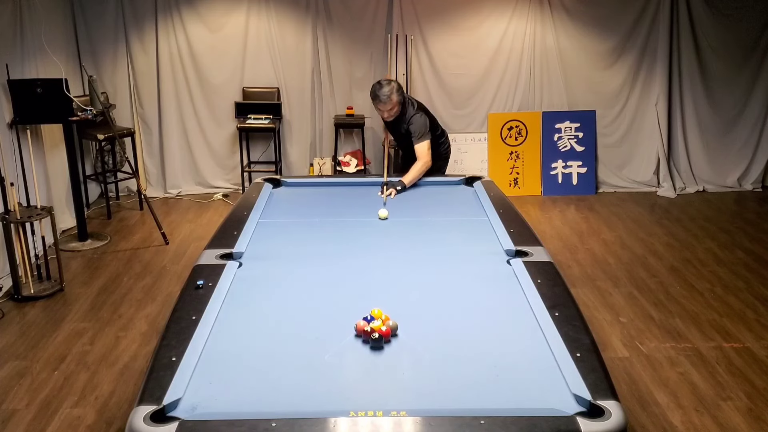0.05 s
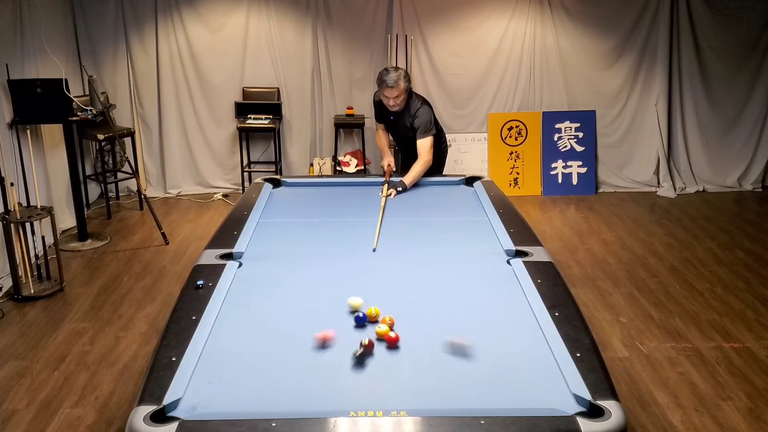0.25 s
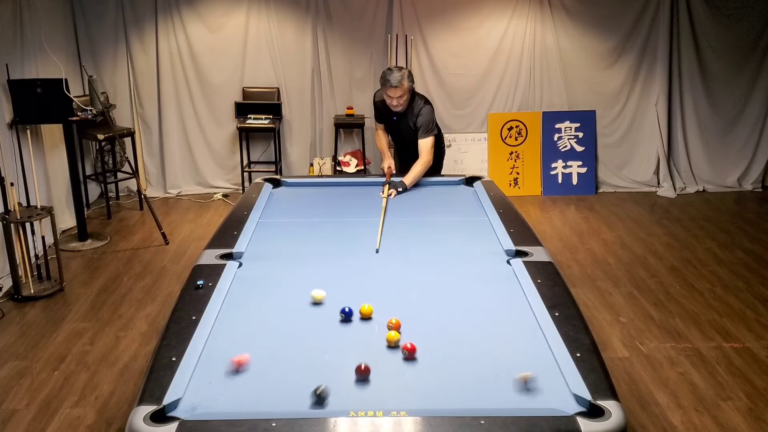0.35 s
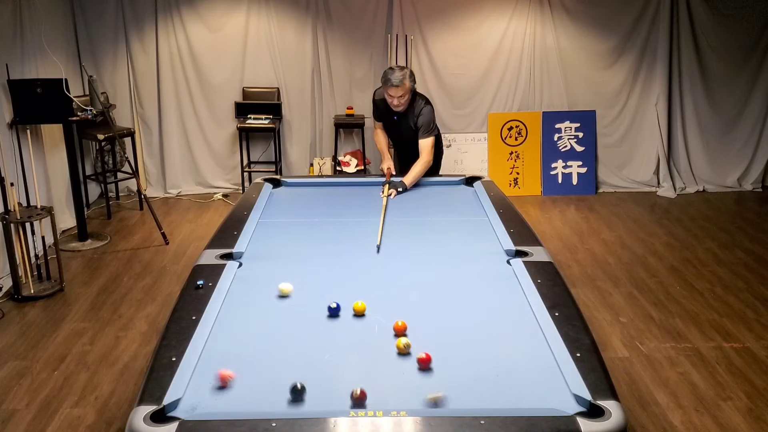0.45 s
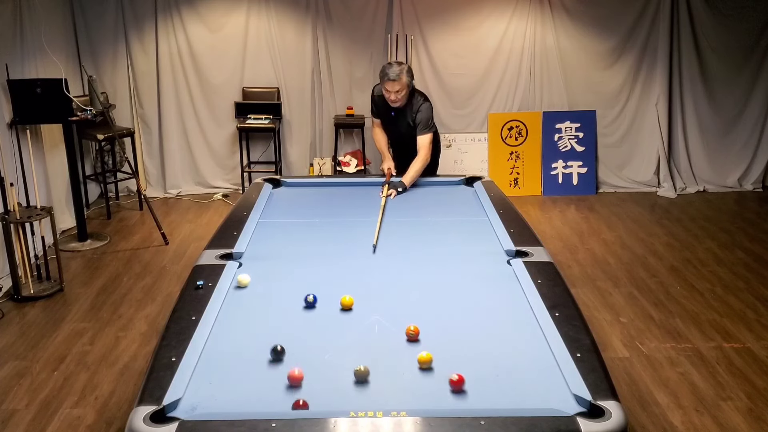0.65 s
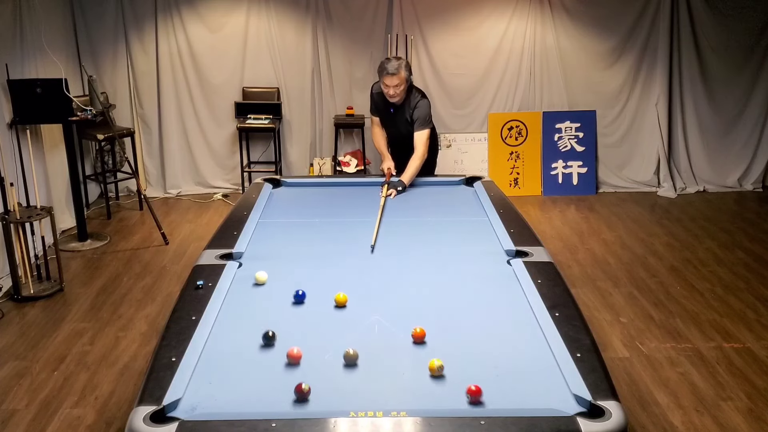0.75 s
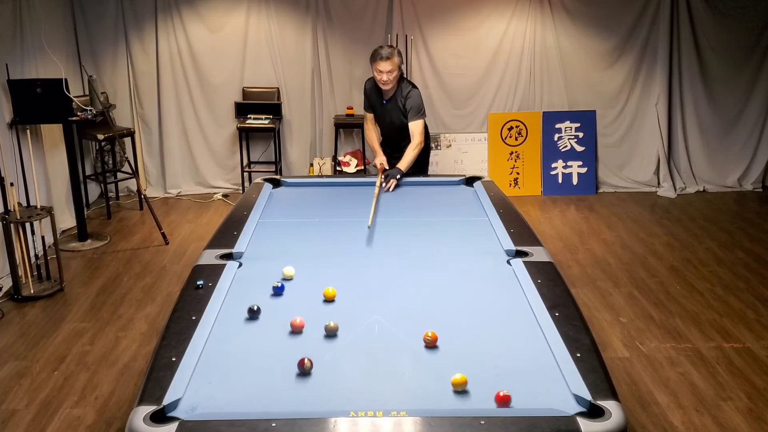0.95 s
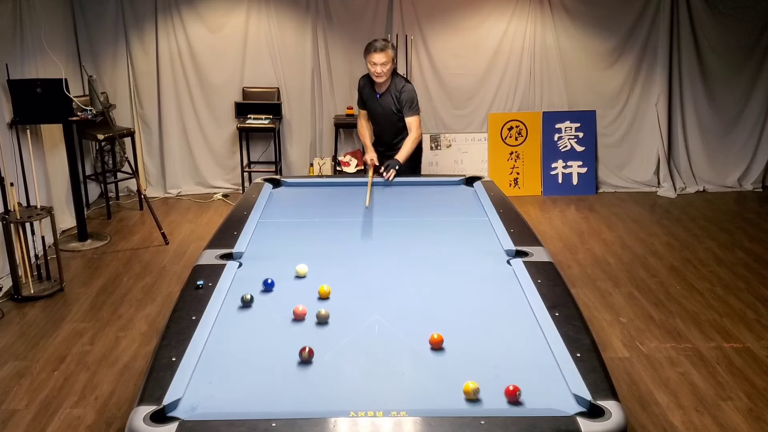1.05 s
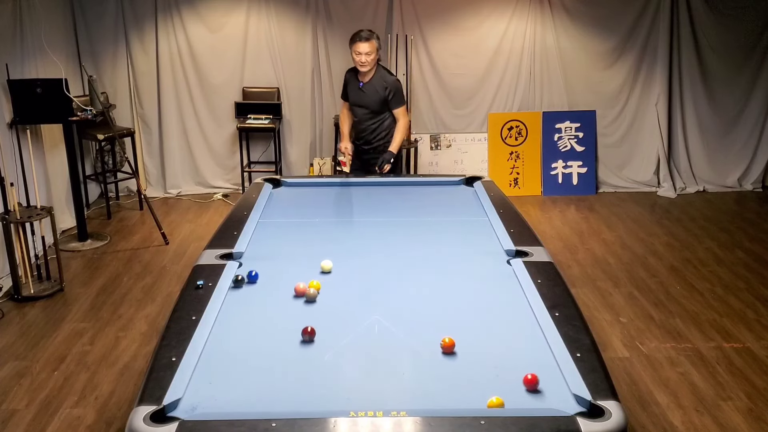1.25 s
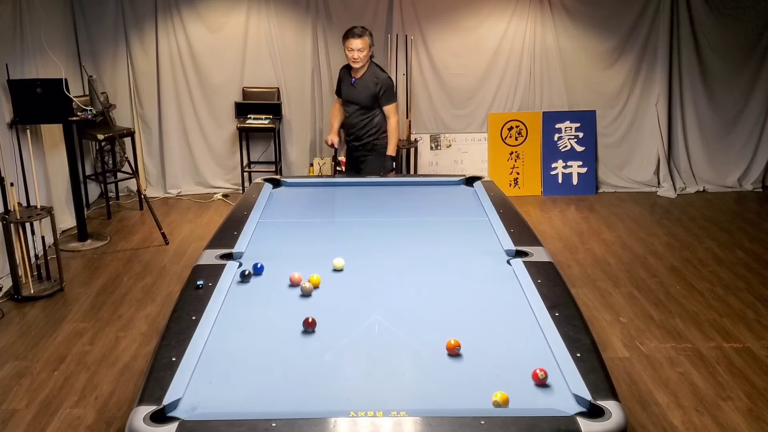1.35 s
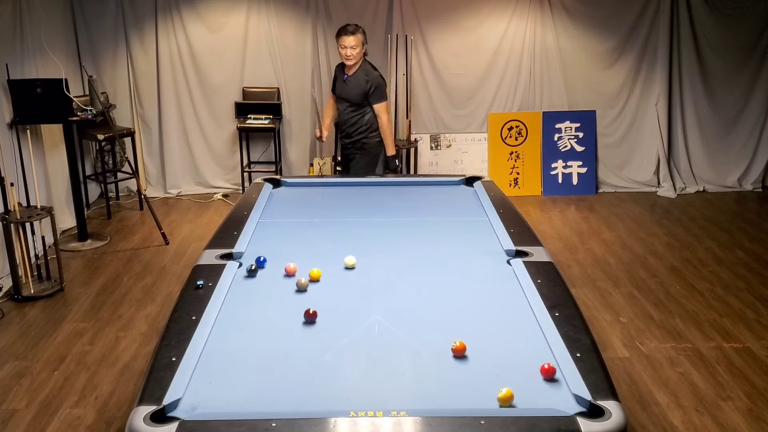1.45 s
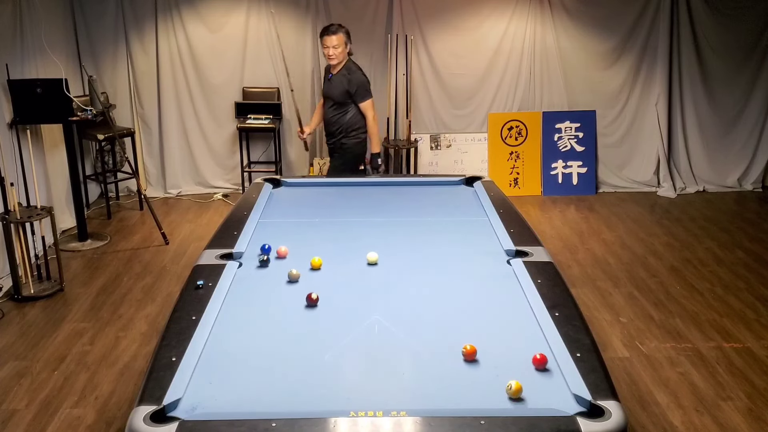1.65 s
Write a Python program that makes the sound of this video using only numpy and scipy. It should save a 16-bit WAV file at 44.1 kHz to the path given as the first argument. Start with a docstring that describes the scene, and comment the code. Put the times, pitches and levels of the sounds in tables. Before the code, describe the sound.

A pool break: cue crack, loud burst of racked balls, then rolling and sharp clicks.

```python
"""A curtained hall, at the foot rail of a pool table: a break shot.
The cue taps the bridge hand, then cracks against the cue ball; shaft and ball ring in damped modes.
The ball bursts the rack, and the brief pressure pulses of the collisions overload the microphone.
The balls scatter, click together, thud into the cushions and rumble over the slate.
The hall reverberates after each blow, over a faint steady background."""
import sys
import numpy as np
from scipy import signal
from scipy.fft import rfft, irfft
from scipy.io import wavfile

SR = 44100
rng = np.random.default_rng(int(sys.argv[2]) if len(sys.argv) > 2 else 0)


def master_out(mix):
    """Clip the mix to full scale and print it as 16-bit PCM to the path in sys.argv[1]."""
    frames = np.transpose(np.atleast_2d(mix))
    ceiling = np.clip(frames, -1, 1)
    pcm = np.round(ceiling * 32767).astype(np.int16)
    wavfile.write(sys.argv[1], SR, pcm)


N = 74970
STROKE_S = .2135


def undb(db):
    """Amplitude ratio of a level: 20 dB to a factor of ten."""
    return 10 ** (np.asarray(db) / 20)


def seconds():
    """Time axis of uniform sampling, t/s."""
    return np.arange(N) / SR


def freqs():
    """Frequency axis of the Fourier transform, f/Hz, held at 1 or above."""
    return np.maximum(np.arange(N // 2 + 1) * SR / N, 1)


def colour(points):
    """Spectral envelope: gain from (f/Hz, level/dB) points, interpolated in log frequency."""
    hz, db = np.array(points).T
    return undb(np.interp(np.log(freqs()), np.log(hz), db))


def noise(gain):
    """Random phases turn a magnitude spectrum into stationary noise of rms 1."""
    x = irfft(gain * np.exp(2j * np.pi * rng.random(len(gain))), N)
    return x / x.std()


def pulse(gain):
    """Minimum phase: folding the cepstrum gives the shortest causal pulse with this spectrum."""
    cepstrum = irfft(np.log(gain), N)
    cepstrum[1:N // 2] *= 2
    cepstrum[N // 2 + 1:] = 0
    return irfft(np.exp(rfft(cepstrum)), N)


def fade(t60):
    """Exponential damping: 60 dB in t60 seconds."""
    return np.exp(-np.log(1000) * seconds() / t60)


def burst(points, t60):
    """Source and filter: the noise of a short rough contact, coloured by the struck body."""
    return signal.fftconvolve(rng.standard_normal(N) * fade(t60), pulse(colour(points)))[:N]


def delay(x, start):
    """Time shift by start seconds."""
    return np.concatenate([np.zeros(int(start * SR)), x])[:N]


def place(x, start, peak_db):
    """Time shift and scaling to a peak level."""
    return delay(x, start) * undb(peak_db) / np.abs(x).max()


def stereo(mid, side, side_db):
    """Left and right as sum and difference of mid and side."""
    return mid + undb(side_db) * side * np.array([[1], [-1]])


def pan(x, left_db):
    """Localisation by left-right level difference."""
    return x * undb(np.array([[left_db], [-left_db]]) / 2)


def background():
    """Stationary noise of the hall, partly correlated between left and right."""
    # background spectrum: f/Hz, level/dB
    spectrum = [(25, -16), (70, -4), (130, -5.5), (230, 5.5), (400, -2), (700, -2), (1100, -8.5),
                (1600, -9.5), (2500, -22.5), (5500, -16.5), (9000, -24), (15000, -27)]
    gain = colour(spectrum)
    return undb(-71) * stereo(noise(gain), noise(gain), side_db=-4.5)


def bridge_tap():
    """A heavily damped impact: the cue touches the bridge hand while aiming."""
    # spectrum of the tap: f/Hz, level/dB
    spectrum = [(100, -8), (250, 8), (380, -7.5), (560, 5), (1000, -9.5), (1600, -4.5), (2500, -27),
                (8000, -40.5)]
    return place(burst(spectrum, t60=.012), start=.020, peak_db=-43)


def rolling():
    """Rolling contact drives the table into a rumble that weakens as the balls slow."""
    # rumble spectrum: f/Hz, level/dB
    spectrum = [(30, -32.5), (55, -19.5), (78, 0.5), (105, -10.5), (200, -8.5), (450, -11), (900, -29),
                (2000, -49)]
    # rumble envelope: t/s, rms level/dB
    envelope = [(.2, -69), (0.242, -56), (.36, -43.5), (.47, -38.5), (0.532, -45), (0.588, -50), (.69, -53),
                (.76, -56), (0.869, -62.5), (.96, -67.5), (1.03, -66), (1.1, -77), (1.401, -70),
                (1.7, -78.5)]
    times, levels = np.array(envelope).T
    return noise(colour(spectrum)) * undb(np.interp(seconds(), times, levels))


def tip_crack():
    """A short impact excites a broad band: the tip bites, then cracks against the cue ball."""
    # spectrum of the contact: f/Hz, level/dB
    spectrum = [(60, -22), (150, -1.5), (370, 0), (650, 7.5), (1000, 1.5), (1700, -3.5), (2600, -2.5),
                (3700, -4.5), (4700, 3), (6100, -11.5), (7800, -9), (9600, -13), (14500, -15)]
    t60, bite_lead_s = .022, .0025
    crack = place(burst(spectrum, t60), STROKE_S, peak_db=-2)
    bite = place(burst(spectrum, t60), STROKE_S - bite_lead_s, peak_db=-26.5)
    return crack + bite


def cue_ring():
    """Free vibration: after the stroke, shaft and ball ring as a sum of damped modes."""
    # modes of cue and ball: f/Hz, level/dB, T60/s
    modes = [(631, -4, .025), (1160, -14, .13), (1637, -9.5, .15), (3052, -24, 0.082), (4255, 2, .025),
             (4654, 1.5, 0.038), (4730, -20.5, 0.27), (5020, 4, 0.025), (6850, -8.5, .02),
             (7870, -5.5, 0.024), (8500, -11.5, .03), (13700, -8.5, .02)]
    t, push_s = seconds(), .00012
    ring = sum(undb(db) * fade(t60) * np.sin(2 * np.pi * (hz * t + rng.random()))
               for hz, db, t60 in modes)
    onset = 1 - np.exp(-t / push_s)
    return undb(-9.5) * delay(ring * onset, STROKE_S)


def thuds():
    """Compliant contact: rubber cushion and wooden rail take each ball with a soft, low knock."""
    # ball against cushion or slate: t/s, peak level/dB, centre f/Hz
    impacts = [(.228, -22.5, 433), (.258, -28.5, 443), (.291, -23.5, 518.4), (.3405, -13.5, 514),
               (0.401, -22.5, 474), (.448, -19.5, 575), (.486, -22.5, 623), (.528, -26.5, 480),
               (0.551, -31, 314), (0.596, -39, 425), (0.624, -36, 365), (0.673, -48.5, 387),
               (0.782, -33, 407), (.815, -45, 319.9), (1.270, -48, 165.4)]
    attack_s, width_octaves = .005, .7
    envelope = fade(t60=.069) * (1 - np.exp(-seconds() / attack_s))
    knocks = np.zeros(N)
    for start, peak_db, hz in impacts:
        band = 1 / (1 + (np.log2(freqs() / hz) / width_octaves) ** 2) ** 2
        knocks += place(noise(band) * envelope, start, peak_db)
    return knocks


def click(low_hz, edge_hz, tick_db):
    """Elastic impact: hard balls radiate one pulse with little bass, brighter for a shorter contact."""
    # faint tick above the upper band edge: f/Hz, level/dB
    tick = [(5000, 1), (6300, -1), (7600, -12), (9400, 2), (12000, -11), (14000, -6), (16000, -18)]
    f = freqs()
    radiation = 1 / np.hypot(1, (low_hz / np.maximum(f, 50)) ** 2.5)
    contact = 1 / (1 + (f / edge_hz) ** 18) + undb(tick_db) * colour(tick)
    return pulse(radiation * contact)


def collisions():
    """Directivity: each click goes straight to the listener and, brighter, out into the hall."""
    # ball against ball: t/s, peak level/dB, lower edge f/Hz, upper edge f/Hz (set by contact time),
    # tick level/dB, level into the hall re direct/dB, left-right level/dB
    impacts = [(0.3406, 4, 1700, 4070, -40, 3.5, 0), (0.3417, 4.5, 1230, 3150, -39, 9, 1),
               (0.3417, -0.5, 1481, 3500, -53, -5, -0.5), (.3447, -5.5, 742.4, 1820, -79.5, -7.5, 2),
               (0.3466, 0.5, 3750, 5220, -55, -1.5, 0.5), (0.3481, -7, 1633, 2559, -50.5, 5, 1.5),
               (0.6642, -28, 1670, 3920, -35, 8.5, 1), (0.6664, -24, 1100, 2880, -39.5, 12.5, 1.5),
               (0.7399, -12.5, 1300, 4030, -77, -2.5, 0), (0.7425, -12, 1018, 2925, -33, 0, 0),
               (0.754, -20.5, 1403, 1987, -63.5, -1, 5), (1.3124, -47.5, 1295, 2860, -53, 15, 3.5),
               (1.3650, -15, 1620, 2880, -52, -4, 2.3), (1.4204, -16.5, 1410, 2743, -47, -5, 0.9)]
    sideways_edge_ratio, sideways_tick_db = 1.105, 5
    direct, to_hall = 0, []
    for start, peak_db, low_hz, edge_hz, tick_db, hall_db, left_db in impacts:
        forward = click(low_hz, edge_hz, tick_db)
        sideways = click(low_hz, edge_hz * sideways_edge_ratio, tick_db + sideways_tick_db)
        direct += pan(place(forward, start, peak_db), left_db)
        to_hall.append(place(sideways, start, peak_db + hall_db))
    return direct, to_hall


def hall(x):
    """Reverberation: early reflections, then a diffuse tail whose treble dies first."""
    # reverberant bands: f/Hz, level/dB, T60/s
    bands = [(80, -5.5, 0.52), (252, 3, 0.75), (550, 1.5, 0.51), (1070, -1, 0.44), (1683.4, -1, 0.4),
             (2800, -5.5, 0.46), (4500, -7.5, 0.35), (7100, -3, 0.31), (10240, -5, 0.21),
             (14000, -4.5, .35)]
    # reflections off table, lamp and floor: delay t/s, level/dB
    reflections = [(.0020, -14.5), (.0058, -17.5), (.0120, -20)]
    build_up_s = .014
    hz, levels, decay_times = np.array(bands).T
    white = rfft(stereo(rng.standard_normal(N), rng.standard_normal(N), side_db=-24.5))
    response = 0
    for db, t60, selector in zip(levels, decay_times, np.eye(len(hz))):
        band = np.interp(np.log(freqs()), np.log(hz), selector)  # triangular in log frequency
        decay = fade(t60)
        response += undb(db) * irfft(white * band, N) * decay / np.linalg.norm(decay)
    response *= 1 - np.exp(-(seconds() / build_up_s) ** 2)
    for delay_s, db in reflections:
        response[:, int(delay_s * SR)] += undb(db)
    return signal.fftconvolve(response, x[None], axes=1)[:, :N]


def scene():
    """Superposition of direct and reverberant sound; different directions raise unrelated tails."""
    air = background()
    rumble = stereo(rolling(), rolling(), side_db=-19)
    crack, ring, tap, knocks = tip_crack(), cue_ring(), bridge_tap(), thuds()
    clicks, clicks_to_hall = collisions()
    direct = tap + pan(crack + ring, left_db=2.5) + knocks + clicks
    to_hall = [crack * undb(-.5), ring * undb(-15), tap * undb(-1), knocks * undb(-10.5)]
    to_hall += clicks_to_hall
    directions = 3  # the sounds are dealt out among these in turn
    reverberation = sum(hall(sum(to_hall[k::directions])) for k in range(directions))
    return direct + reverberation + rumble + air


def record(dry):
    """Band limiting and saturation: the microphone drops deep bass, flattens peaks and cuts the top."""
    low_cut_hz, top_hz, knee = 60, 15900, 10
    thin = signal.sosfilt(signal.butter(3, low_cut_hz, "high", fs=SR, output="sos"), dry)
    saturated = thin / (1 + np.abs(thin) ** knee) ** (1 / knee)
    return signal.sosfilt(signal.ellip(8, .2, 70, top_hz, fs=SR, output="sos"), saturated)


dry = scene()
out = record(dry)
master_out(out)
```